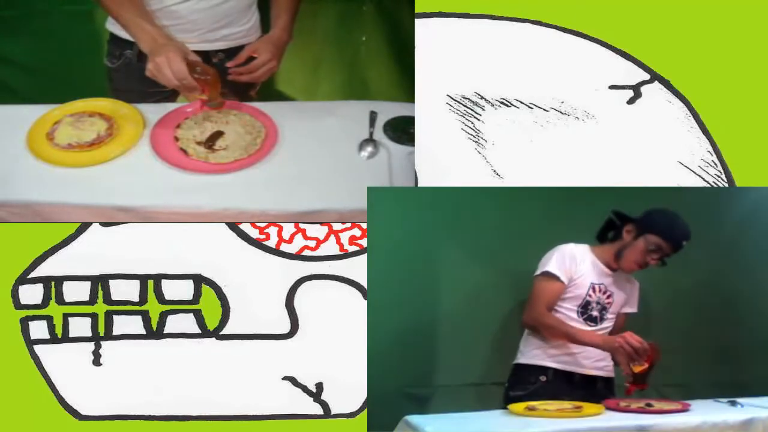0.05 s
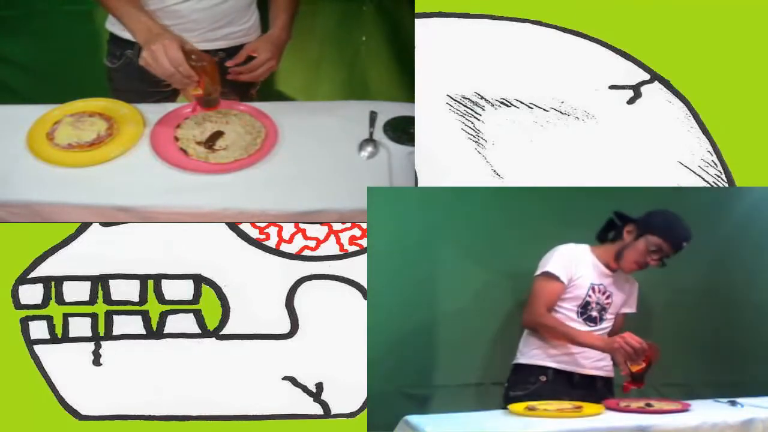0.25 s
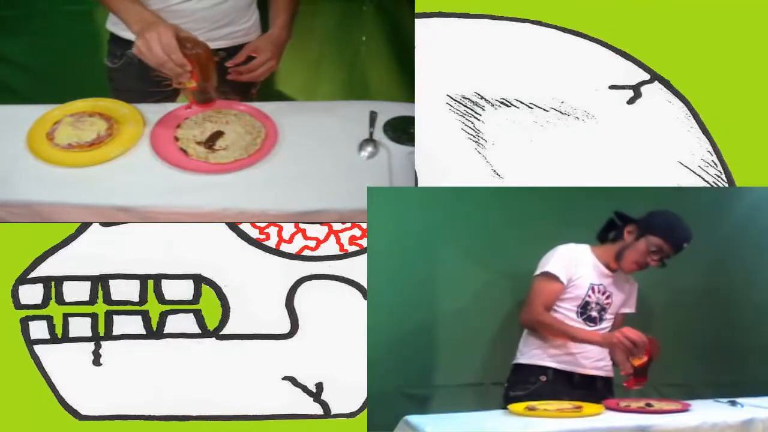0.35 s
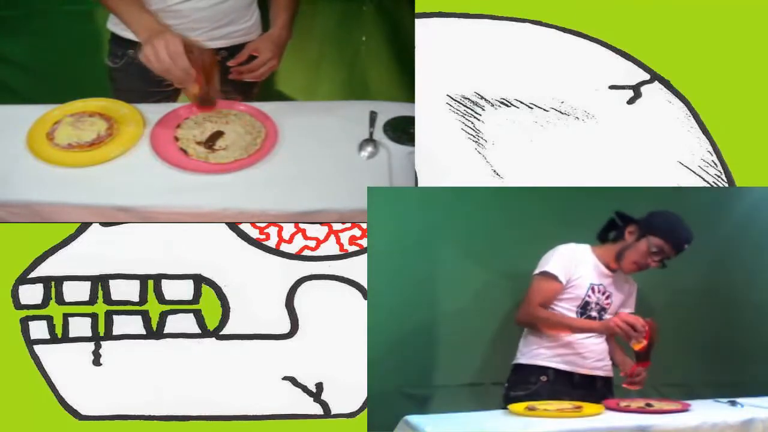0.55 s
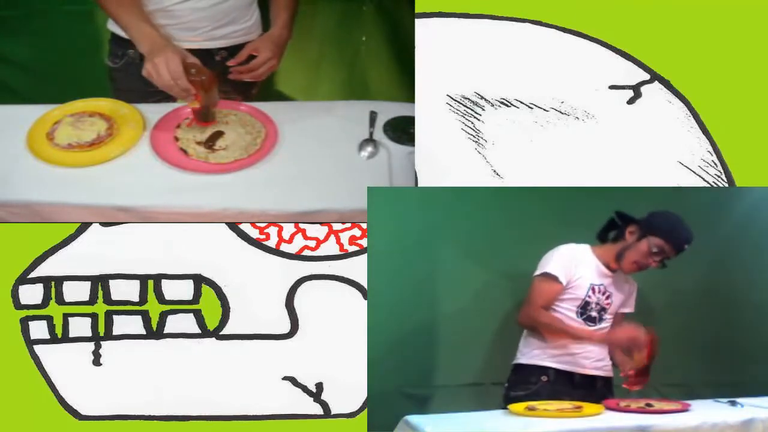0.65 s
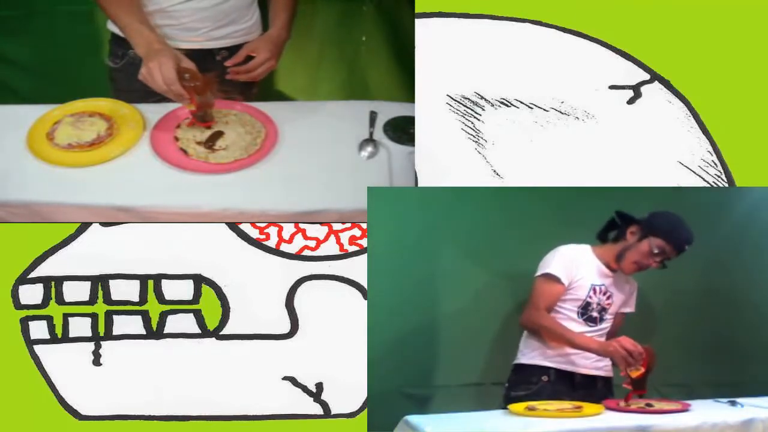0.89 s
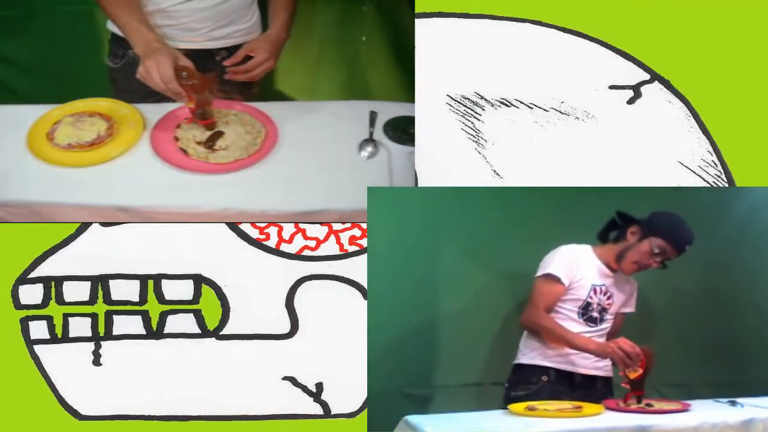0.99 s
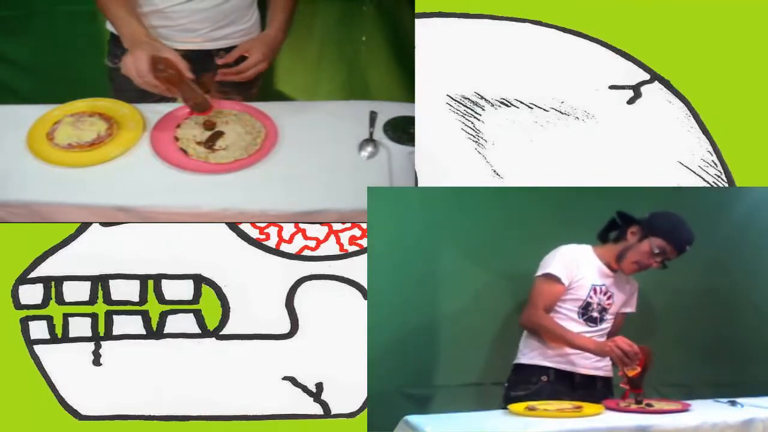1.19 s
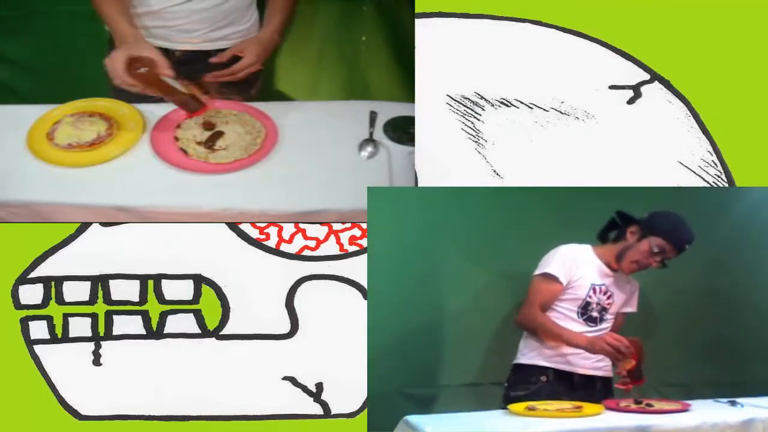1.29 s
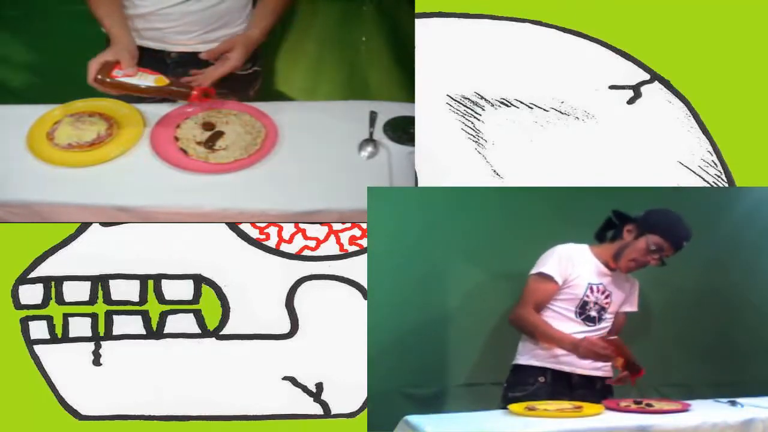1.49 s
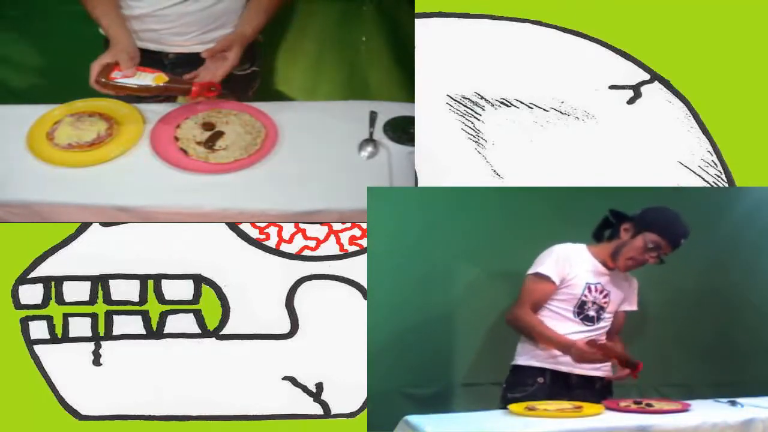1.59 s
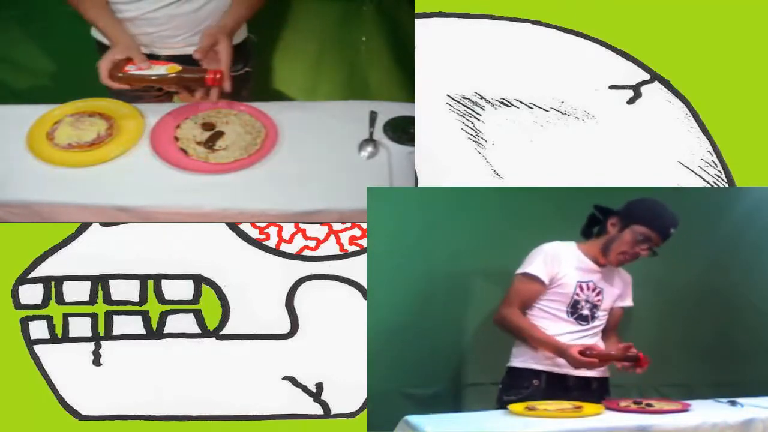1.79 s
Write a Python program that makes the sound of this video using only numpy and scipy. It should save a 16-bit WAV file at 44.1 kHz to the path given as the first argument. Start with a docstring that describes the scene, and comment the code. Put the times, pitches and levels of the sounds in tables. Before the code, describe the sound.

A plastic sauce bottle is slapped with hollow thumps and a wet squelch in a kitchen.

```python
"""A plastic sauce bottle held over a table is slapped by a palm: its body thumps, its base knocks, its wall snaps.
Air and sauce sputter in the nozzle as flickering hiss, gurgle and small bubbles; a pop opens the spurt.
Fingers bump the wall softly. A kitchen rumbles and hums underneath, as coloured noise and unsteady tones,
and a short room tail follows the bottle and nozzle.
A cheap camera samples it all at about 8 kHz in coarse steps and holds each value as a staircase."""
import sys
import numpy as np
from scipy import signal
from scipy.fft import rfft, irfft, next_fast_len
from scipy.io import wavfile
from scipy.ndimage import map_coordinates

SR = 44100
rng = np.random.default_rng(int(sys.argv[2]) if len(sys.argv) > 2 else 0)


def natural_amplitude(level_db):
    """Convert a level in decibels to a linear amplitude factor, elementwise."""
    exponent = np.asarray(level_db, float) / 20
    return 10 ** exponent


def store_pcm(level_fs):
    """Save levels as 16-bit WAV."""
    pcm = np.round(np.clip(level_fs, -1, 1) * 32767).astype(np.int16)
    wavfile.write(sys.argv[1], SR, np.atleast_2d(pcm).T)


N = 81585  # length in samples


def unit(x):
    """Scale to rms 1."""
    return x / np.sqrt(np.mean(x ** 2) + 1e-20)


def along(points, hz):
    """Read a curve of (f/Hz, value) points on a log frequency axis."""
    f, value = np.transpose(points)
    return np.interp(np.log(hz + 1), np.log(f + 1), value)


def wobble(rate):
    """A smooth random curve through `rate` knots a second."""
    knots = rng.standard_normal(int(N * rate / SR) + 4)
    return map_coordinates(knots, [np.arange(N) * rate / SR])


def noise(spectrum):
    """White noise shaped by a spectrum, then set to rms 1."""
    size = next_fast_len(N)
    gain = natural_amplitude(along(spectrum, np.fft.rfftfreq(size, 1 / SR)))
    return unit(irfft(rfft(rng.standard_normal(size)) * gain, size)[:N])


# colour of the kitchen rumble, relative: f/Hz, level/dB per Hz
RUMBLE_COLOUR = [(8.8, -34), (15, -1.5), (97, -12), (209, -17.5), (276, -19), (451, -27.5), (738, -28.5),
                 (804, -36.5), (914, -29.5), (1210, -40), (2500, -41.5), (3250, -65.5), (5500, -120)]
# machine tones, before a common lift of 2.5 dB: f/Hz, level/dB
HUM_TONES = [(30, -51), (60, -52), (90, -50.5), (119, -56), (888.5, -60.5)]


def kitchen():
    """Lumpy low noise, and machine tones that drift slightly in level and phase."""
    t = np.arange(N) / SR
    rumble = natural_amplitude(-42 + 1.6 * wobble(12)) * noise(RUMBLE_COLOUR)
    hum = np.zeros(N)
    for hz, db in HUM_TONES:
        level = natural_amplitude(db + 2.5 + 1.3 * wobble(5))
        cycles = hz * t + rng.random()
        hum += level * np.sin(2 * np.pi * cycles + 0.15 * wobble(5))
    return rumble + hum


def bubbles():
    """Small wet bubbles: gliding damped sines of scattered pitch and size, at random times, rms 1."""
    per_second, grain_samples = 700, 400
    centre_hz, decay_cycles = 3600, 5.1
    count = int(per_second * N / SR)
    pitch, glide = rng.standard_normal((2, count, 1))
    cycles = np.arange(grain_samples) / SR * centre_hz * np.exp(0.25 * pitch)
    size = natural_amplitude(9.6 * np.minimum(rng.exponential(size=(count, 1)), 2.5))
    envelope = cycles * np.exp(-np.pi * cycles / decay_cycles)
    grains = size * envelope * np.sin(2 * np.pi * (cycles + 0.011 * glide * cycles ** 2))
    at = (rng.random((count, 1)) * N).astype(int) + np.arange(grain_samples)
    return unit(np.bincount(at.ravel(), grains.ravel(), N + grain_samples)[:N])


# four bouts of nozzle flow: t/s, level/dB, gurgle level/dB re hiss
SQUELCH_FLOW = [(0.12, -69, 14), (0.13, -64, 0), (0.148, -56, 6), (0.16, -44, -3), (0.176, -46, 1.5),
                (0.194, -53, 11), (0.204, -34.5, 0), (0.264, -55, -1.5), (0.268, -50.5, 23)]
SPURT_FLOW = [(.872, -71, -9), (.8845, -57, -4), (.887, -48.5, 8.5), (.9, -48.5, -3), (.92, -55, -10),
              (.94, -57, -0.5), (.97, -62.5, -4.5)]
SUCK_FLOW = [(1.045, -57, 11), (1.06, -61, 10.5), (1.078, -45.5, -24), (1.09, -51, 1), (1.1, -73, -23),
             (1.109, -60.5, -7)]
SPIT_FLOW = [(1.722, -93.5, -19), (1.728, -57, -2.5), (1.77, -63, -5)]
# nozzle colours (two hisses and the gurgle), relative: f/Hz, level/dB per Hz
WIDE_HISS = [(880, -52), (1500, -2.5), (1740, -12.5), (2070, -14.5), (2780, -5), (3080, -2.5), (3370, 1.5),
             (4000, -8.5), (5200, -49.5), (8800, -120)]
NARROW_HISS = [(880, -45), (1500, -24.5), (1850, -4.5), (2160, -1), (2350, -4.5), (3650, -0.5),
               (4000, -4.5), (5200, -73), (8800, -120)]
GURGLE_COLOUR = [(240, -34.5), (400, -3.5), (597, -2), (821, -5.5), (944, -7.5), (1600, -13.5), (2080, -44),
                 (3520, -120)]


def nozzle():
    """Air forced through sauce: sputtering hiss and a lower gurgle, with bubbles that share the flow's level."""
    wet_db, dry_db = -7.5, -15  # bubble level re hiss, in a saucy and in an airy flow
    sputter_db, sputter_rate = 2.5, 300  # depth, knots a second
    out, t, bubbling = np.zeros(N), np.arange(N) / SR, bubbles()
    flows = [(SQUELCH_FLOW, WIDE_HISS, wet_db), (SPURT_FLOW, NARROW_HISS, dry_db),
             (SUCK_FLOW, WIDE_HISS, dry_db), (SPIT_FLOW, WIDE_HISS, dry_db)]
    for flow, colour, bubble_db in flows:
        s, db, gurgle_db = np.transpose(flow)
        sputter = unit(natural_amplitude(sputter_db * wobble(sputter_rate)))
        gurgle = natural_amplitude(np.interp(t, s, gurgle_db)) * noise(GURGLE_COLOUR)
        air = sputter * (noise(colour) + gurgle)
        level = natural_amplitude(np.interp(t, s, db, -120, -120))
        out += level * (air + natural_amplitude(bubble_db) * bubbling)
    return out


def ring(modes, spread_db):
    """Decaying modes set off once, neighbours in opposite sense, each level a little new."""
    t, out = np.arange(SR // 2) / SR, np.zeros(SR // 2)
    for k, (hz, db, t60) in enumerate(modes):
        decay = natural_amplitude(db + spread_db * rng.standard_normal() - 60 * t / t60)
        out += (-1) ** k * decay * np.sin(2 * np.pi * hz * t)
    return out


def struck(modes, contact):
    """Modes driven by the acceleration of a smooth dent: a longer contact (s) sounds duller."""
    dent = np.hanning(int(contact * SR) + 5) ** 2
    push = -np.diff(dent, 2)
    return signal.fftconvolve(ring(modes, spread_db=2.5), 2 * push / np.abs(push).sum())[:SR // 2]


def snap(hz):
    """The wall's snap: a narrow band of noise round hz with a quick rise and a short decay."""
    rise_s, t60, width = 0.001, 0.036, 0.068  # width as a fraction of hz
    t = np.arange(SR // 2) / SR
    band = [(hz * (1 - 4 * width), -25), (hz, 0), (hz * (1 + 4 * width), -25), (8000, -90)]
    return noise(band)[:SR // 2] * natural_amplitude(-60 * t / t60) * (1 - np.exp(-t / rise_s))


# blows on the bottle, and the pop that opens the spurt (.8845):
# t/s, thump level/dB, contact/s, knock level/dB, snap level/dB, snap f/Hz
BLOWS_AND_POP = [(.2030, -25, 0.0031, -43, -36.5, 2630), (.2690, -9.5, 0.0058, -22, -35.5, 2710),
                 (.2835, -13, .005, -22.5, -40, 2580), (.2985, -23, 0.0058, -31, -46, 2670),
                 (.3065, -22.5, .004, -28.5, -52, 2720), (.8845, -42.5, 0.0033, -28.5, -46, 1980),
                 (1.0780, -10.5, 0.0071, -37, -40, 3520), (1.1095, -16.5, .004, -13, -28.5, 3570),
                 (1.1160, -20, 0.0042, -21, -36, 3600)]
# soft finger bumps, thump and knock set below these levels: t/s, level/dB
FINGER_BUMPS = [(0.14, -24.5), (0.479, -37), (0.548, -36), (0.71, -36.5), (0.84, -28.5), (0.877, -27),
                (0.977, -27.5), (1.311, -34.5), (1.375, -30), (1.58, -33.5), (1.644, -32.5), (1.726, -25.5)]
# hollow body and table modes: f/Hz, level/dB, T60/s
BODY_MODES = [(134.1, -22, 0.23), (187.4, -12, 0.25), (232.6, 1, .024), (224.6, -22.5, 0.24),
              (270.4, -24, 0.13), (350.2, -22, 0.16), (385.6, -10, .02)]
# stiff base and cap modes: f/Hz, level/dB, T60/s
BASE_MODES = [(408.8, -4.5, .1), (464.5, -7, 0.13), (546.9, -5, .16), (728.3, -9.5, 0.067),
              (817.4, -8, .07), (879, -1, 0.016), (1003, -12.5, 0.023), (1165, -18, 0.026)]


def bottle():
    """Each blow, bump or pop thumps the hollow body; mid-push the stiff base knocks and the wall snaps."""
    out = np.zeros(N + SR)
    # a finger bump has a short contact, a faint knock and a snap too low to hear
    bumps = [(s, db - 2.5, 0.0025, db - 16.5, -120, 3000) for s, db in FINGER_BUMPS]
    for s, thump_db, contact, knock_db, snap_db, snap_hz in BLOWS_AND_POP + bumps:
        start, middle = round(s * SR), round((s + contact / 2) * SR)
        knock = natural_amplitude(knock_db) * struck(BASE_MODES, contact=0.0009)
        out[start:][:SR // 2] += natural_amplitude(thump_db) * struck(BODY_MODES, contact)
        out[middle:][:SR // 2] += knock + natural_amplitude(snap_db) * snap(snap_hz)
    return out[:N]


# decay of the room: f/Hz, T60/s
ROOM_DECAY = [(150, 0.38), (600, .28), (1500, 0.15), (4000, .12)]


def room(x):
    """The room's answer: a noise tail, 300 samples late, whose frequencies each die at their own speed."""
    hz, t, z = signal.stft(rng.standard_normal(SR // 2), SR, nperseg=512)
    decay = natural_amplitude(-60 * t / along(ROOM_DECAY, hz)[:, None])
    tail = signal.istft(z * decay, SR, nperseg=512)[1]
    return signal.fftconvolve(np.pad(x, (300, 0)), tail / np.linalg.norm(tail))[:N]


def scene():
    """Bottle and nozzle with their room tail, over the kitchen."""
    near = nozzle() + bottle()
    return (near + natural_amplitude(-12.5) * room(near) + kitchen())[None]


def top_cut(x):
    """Nothing passes above the cut-off."""
    return signal.sosfilt(signal.butter(12, 16950, fs=SR, output="sos"), x)


def record(dry):
    """The camera samples slowly, rounds down to coarse steps, holds each value and trims the top."""
    camera_hz, step, clock_lag = 8006.8, 0.003864, 0.337  # lag in camera samples
    top_hz, top_db = 15750, -40
    ticks = np.arange(-1, N / SR * camera_hz + 1) + clock_lag
    sampled = map_coordinates(dry[0], [ticks / camera_hz * SR], mode="nearest")
    stepped = step * np.floor(sampled / step)
    held = np.floor(np.arange(N) / SR * camera_hz - clock_lag + 1).astype(int)
    stairs = stepped[held]  # the staircase leaves mirror images above half the camera rate
    above_top = np.fft.rfftfreq(N, 1 / SR) > top_hz
    trimmed = irfft(rfft(stairs) * natural_amplitude(top_db * above_top), N)
    return top_cut(trimmed[None])


dry = scene()
out = record(dry)
store_pcm(out)
```